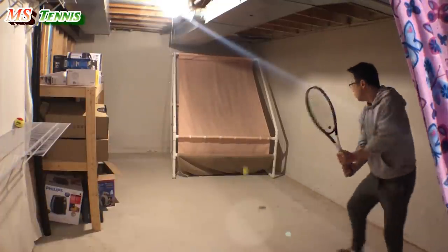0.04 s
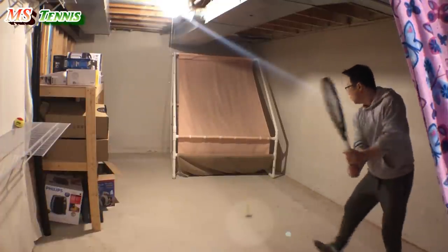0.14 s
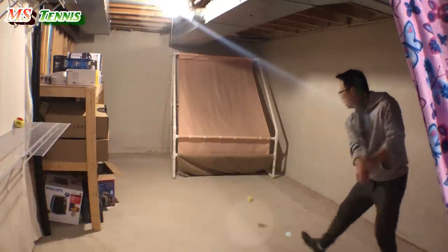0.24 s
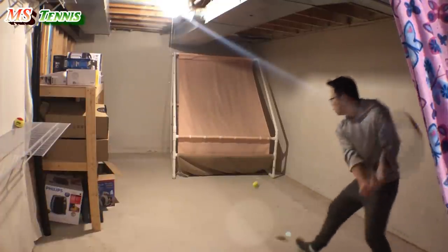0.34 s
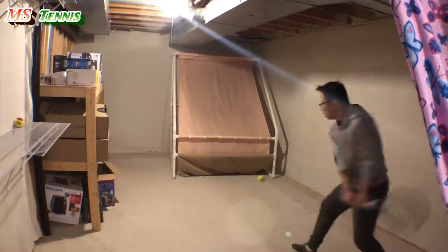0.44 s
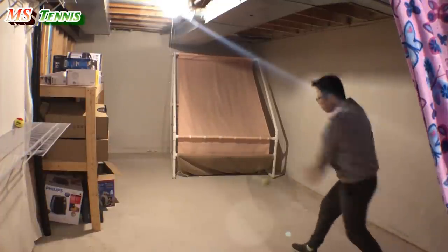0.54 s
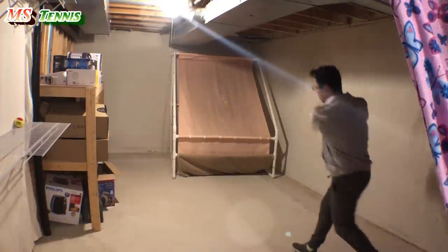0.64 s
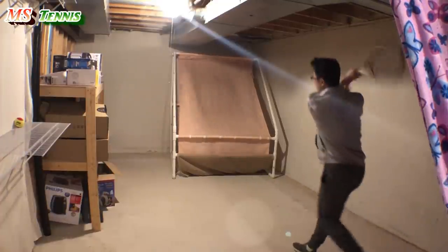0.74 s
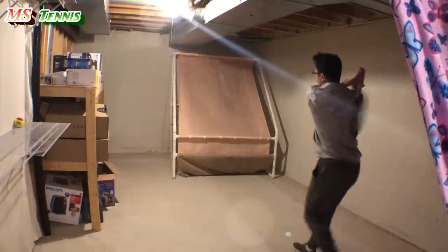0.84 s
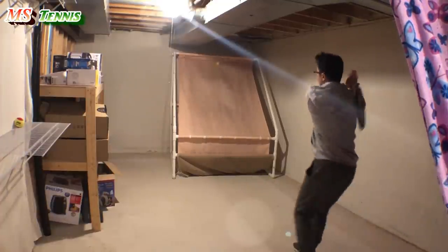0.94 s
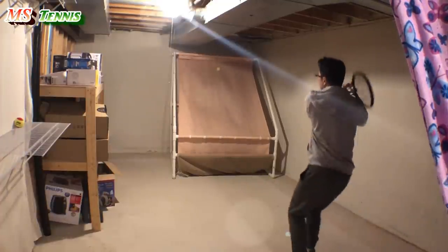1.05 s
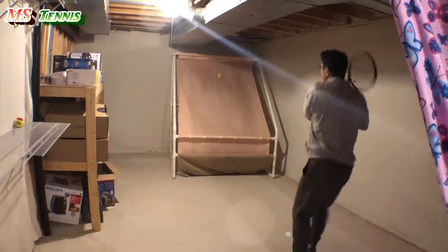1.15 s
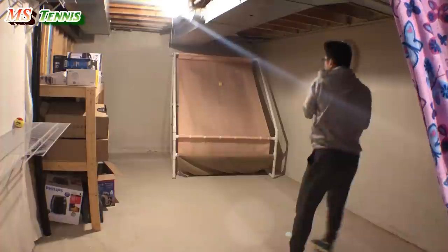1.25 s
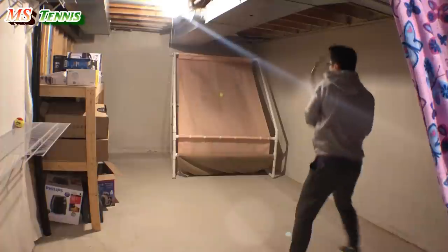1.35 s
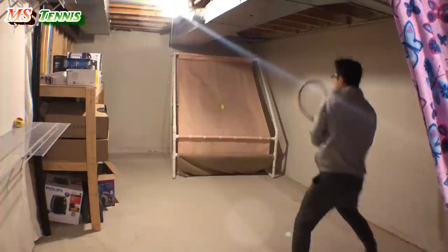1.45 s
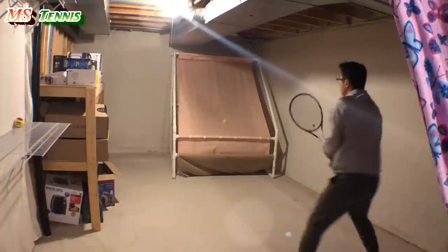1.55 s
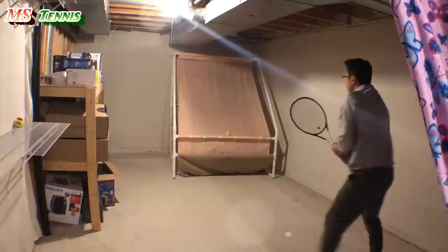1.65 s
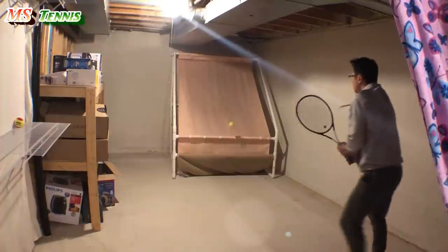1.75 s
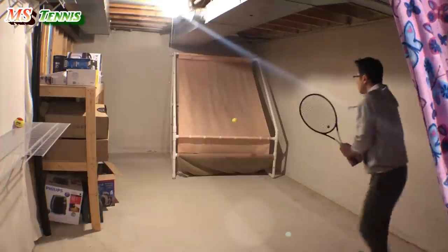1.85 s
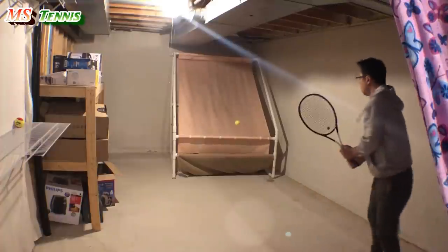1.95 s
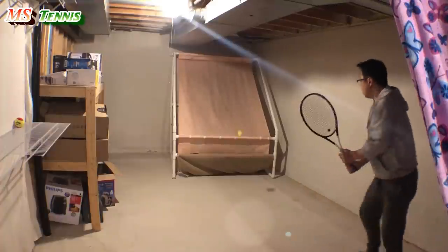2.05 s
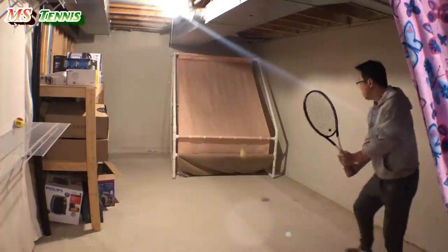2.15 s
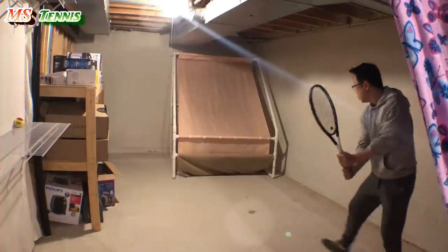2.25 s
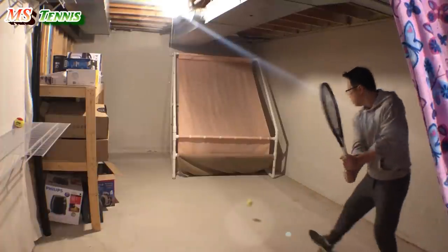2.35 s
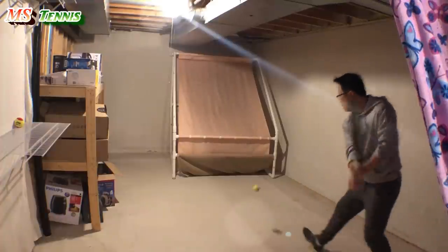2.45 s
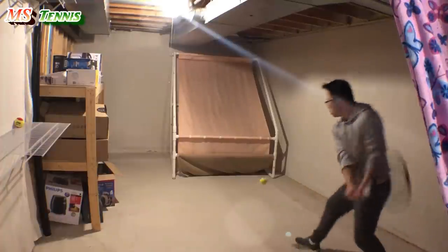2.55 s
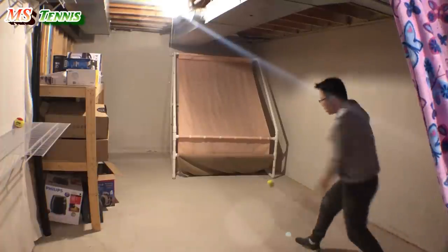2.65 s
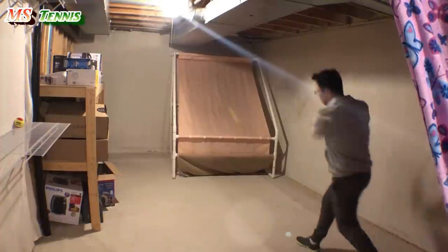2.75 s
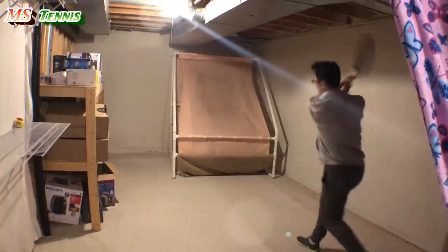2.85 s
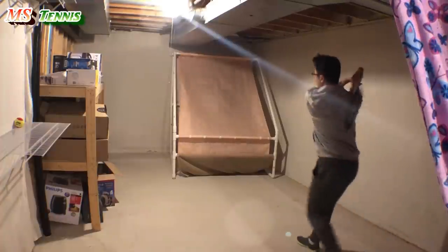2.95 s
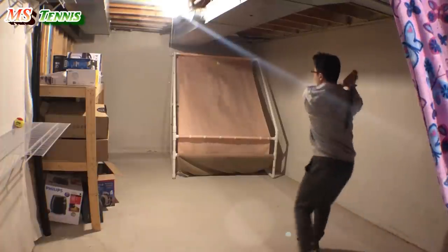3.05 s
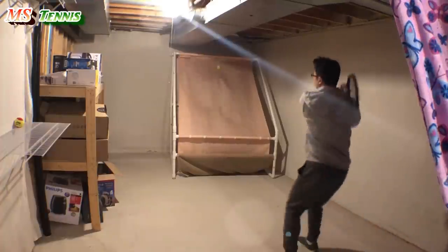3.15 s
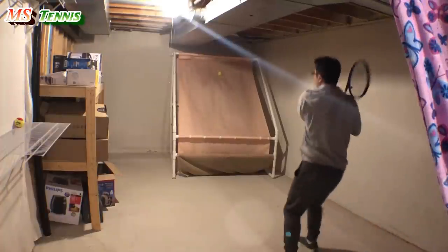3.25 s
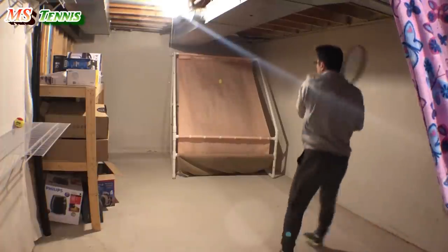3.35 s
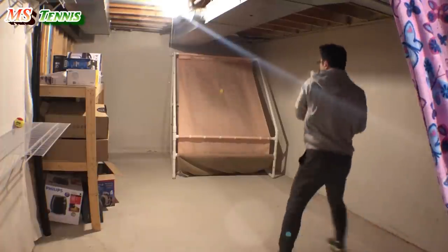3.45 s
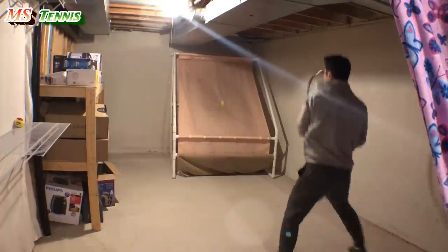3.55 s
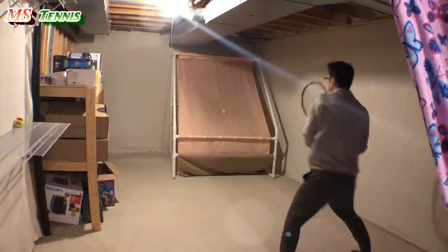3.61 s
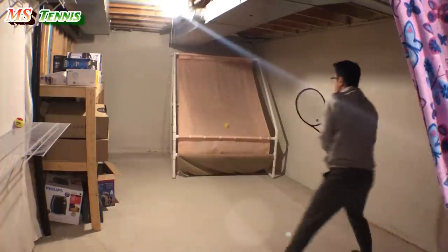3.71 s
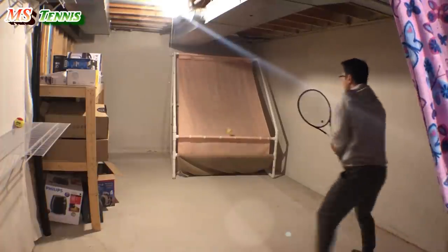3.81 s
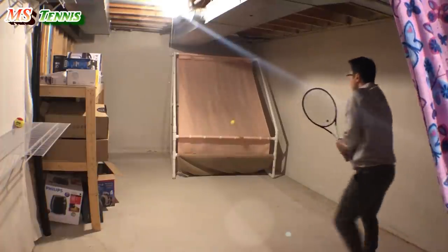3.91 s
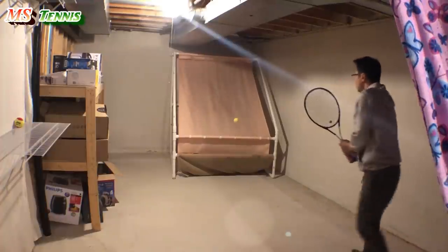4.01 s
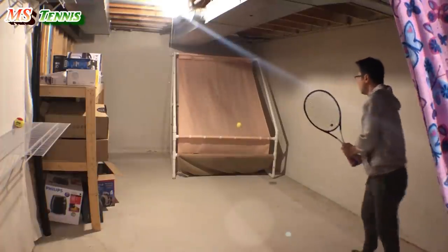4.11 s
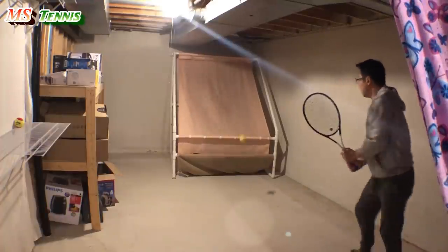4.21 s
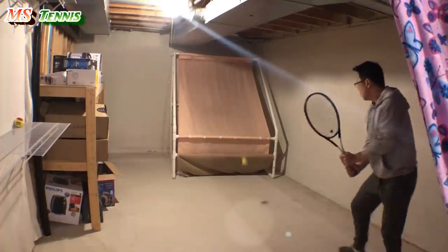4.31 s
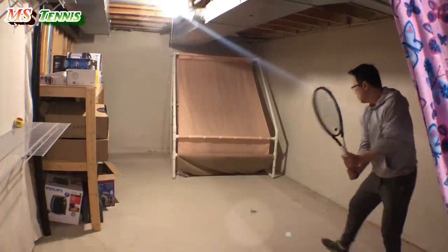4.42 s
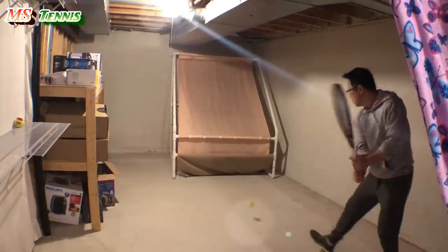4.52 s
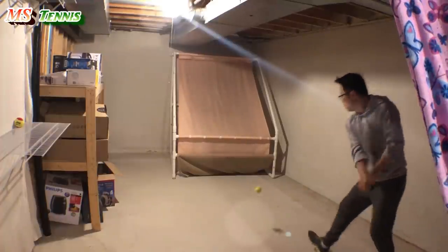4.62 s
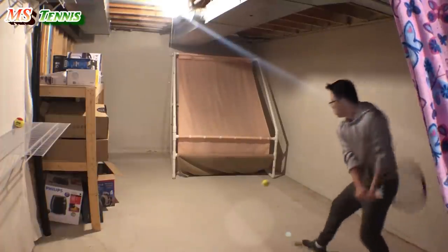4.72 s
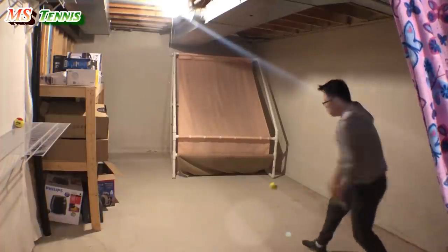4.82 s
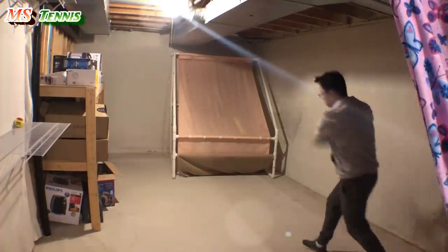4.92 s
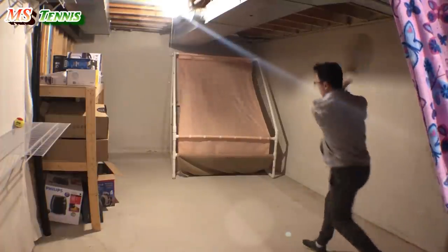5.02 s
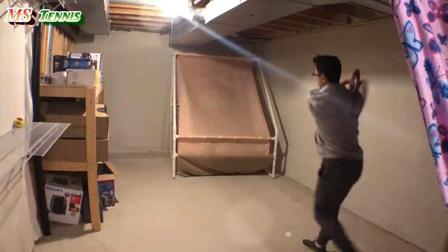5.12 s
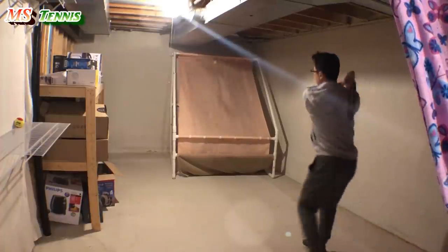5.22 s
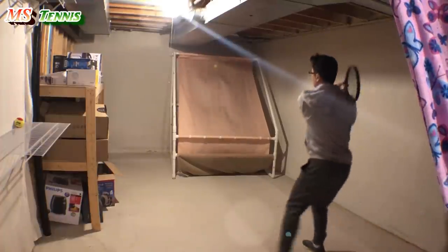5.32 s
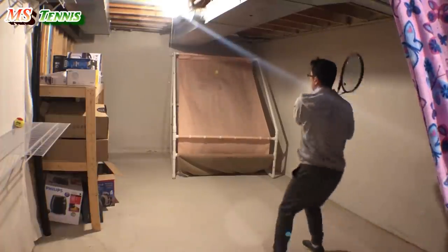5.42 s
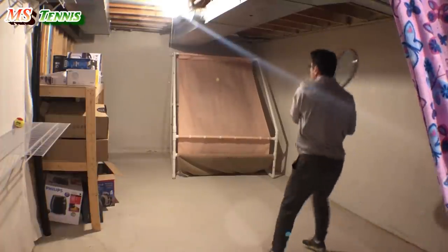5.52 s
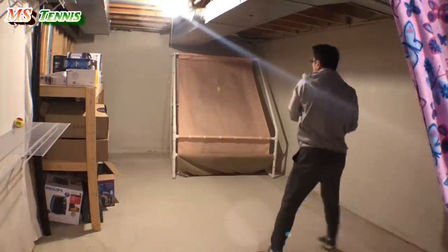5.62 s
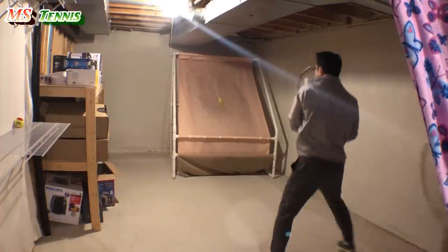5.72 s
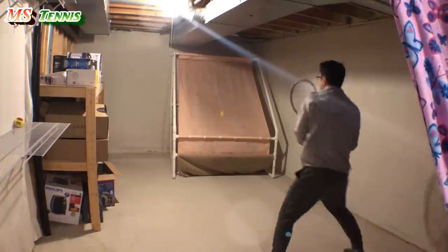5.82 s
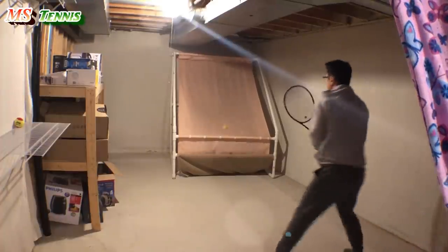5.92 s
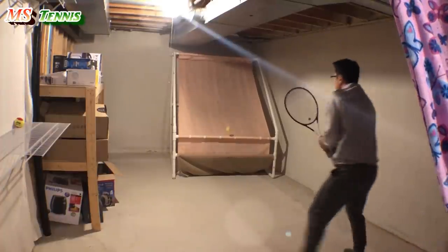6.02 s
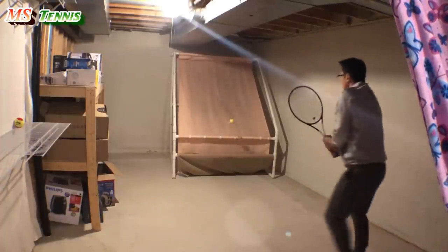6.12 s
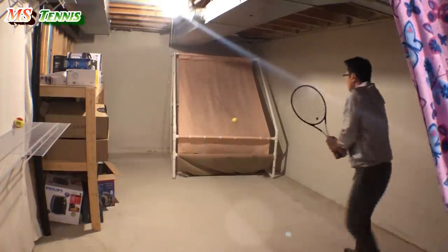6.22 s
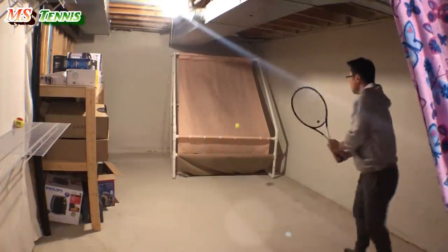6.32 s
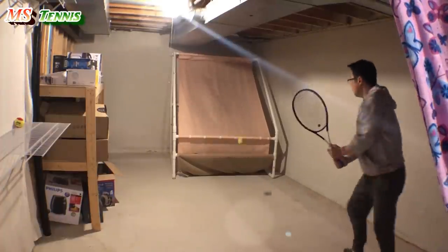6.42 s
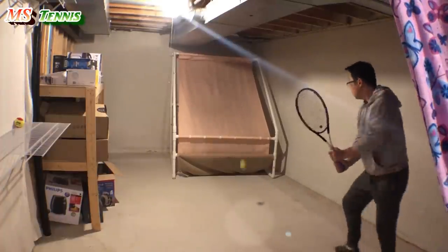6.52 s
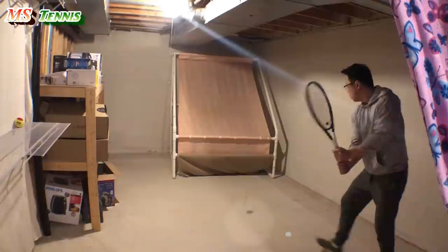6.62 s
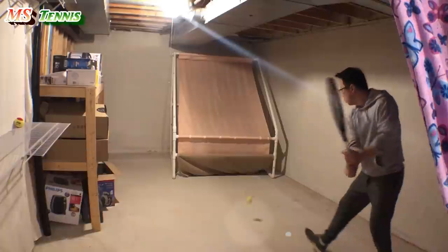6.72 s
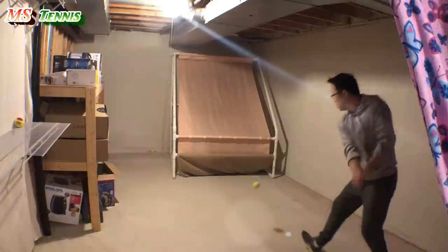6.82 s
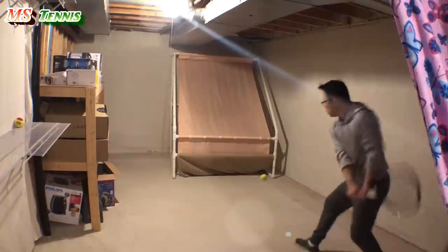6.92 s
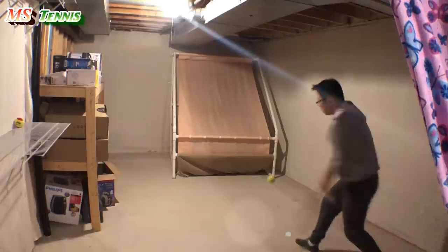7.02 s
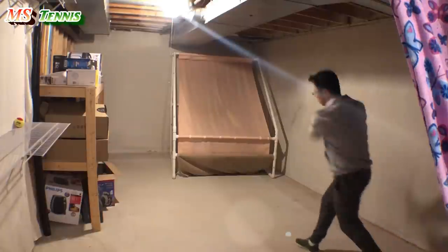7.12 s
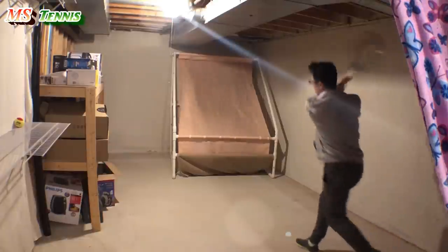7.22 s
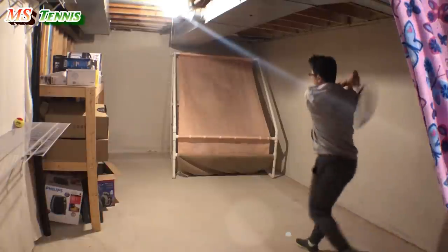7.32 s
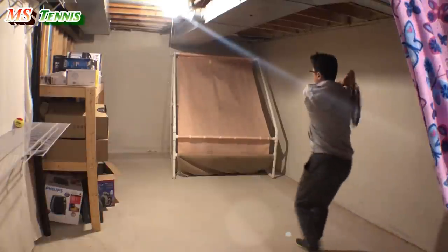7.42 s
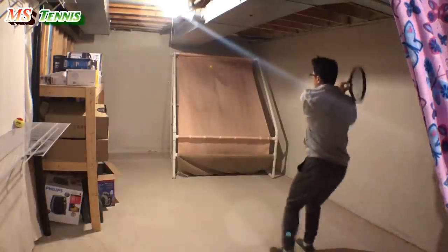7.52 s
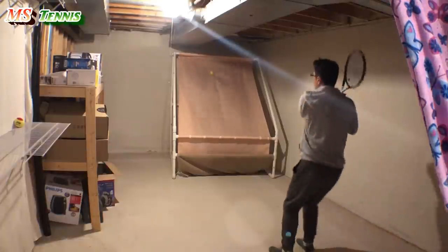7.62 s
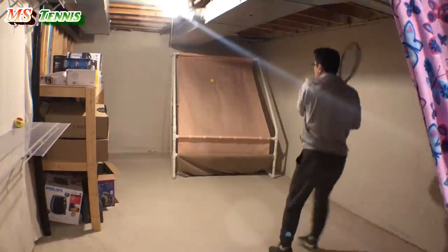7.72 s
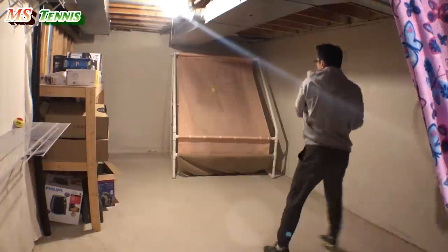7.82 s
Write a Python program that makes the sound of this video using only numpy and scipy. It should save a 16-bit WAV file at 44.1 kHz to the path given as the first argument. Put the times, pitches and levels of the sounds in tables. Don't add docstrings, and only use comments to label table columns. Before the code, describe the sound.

In a small, hard-walled basement, a tennis ball knocks softly on concrete, then pops sharply off racket strings. A moment later it thuds into hanging cloth, whose frame cracks loudly. A shoe scuffs, the bar clacks, the ball drops softly back into the cloth, and the cycle repeats about every two seconds, four strokes in all. A small, midrange-heavy microphone hears it with short bright room echo.

```python
import sys
import numpy as np
from scipy import signal
from scipy.fft import rfft, irfft
from scipy.io import wavfile
from scipy.ndimage import uniform_filter1d

SR = 44100
rng = np.random.default_rng(int(sys.argv[2]) if len(sys.argv) > 2 else 0)


def natural_amplitude(level_db):
    exponent = np.asarray(level_db, float) / 20
    return 10 ** exponent


def to_wav(s):
    ch = np.atleast_2d(s).T
    pcm = np.round(np.clip(ch, -1, 1) * 32767)
    wavfile.write(sys.argv[1], SR, pcm.astype(np.int16))


N = 346537
TAIL = 24576
FAINT_DB = -17

# start_s, peak_db, contact_s, treble_shelf_db, bass_shelf_db
STROKES = [
    (0.62, -9.5, 0.0057, -1, -2.5),
    (2.78, -9.5, 0.0016, -1.8, -2.5),
    (4.962, -10, 0.0021, -1.6, -0.8),
    (7.155, -12, 0.0012, 0.086, -0.5),
]
# start_s, peak_db, contact_s, treble_shelf_db, bass_shelf_db
CATCHES = [
    (0.746, -21, 0.037, 0.8, -3.5),
    (1.724, -34.5, 0.016, -1.5, -2.5),
    (2.907, -17, 0.034, -1, -0.5),
    (3.891, -35, 0.025, -1.5, -4),
    (5.088, -20, 0.087, 0, -4.5),
    (6.075, -35, 0.03, -3.4, -3.5),
    (7.282, -16.5, 0.021, -3, 0.5),
]
# frequency_hz, level_db
MIC = [(20, -22), (55, 2), (1500, 2), (2150, 4.5), (2530, 7), (3100, -4), (4500, -10), (6100, -16),
       (6900, -12), (8300, -27), (9700, -15), (12300, -25.5), (15300, -13.5), (15850, -26), (16100, -49.5)]


def racket_strokes():
    # frequency_hz, level_db
    strings = [(60, -19), (150, -12), (240, -4), (420, -0.5), (540, -8.5), (780, -4.5), (980, 0),
               (1150, -4), (1450, -15.5), (2400, -12), (3300, -13), (4800, -10), (9000, -14.5),
               (16000, -25)]
    # frequency_hz, width_hz, level_db
    racket_modes = [(242, 23, 0), (399, 55, -4.5), (1700, 114, 1.5), (1070, 190, -8.5), (2394, 72, 0),
                    (3210, 160, 2), (4880, 380, -1)]
    hits = blows(STROKES, strings, direct_db=FAINT_DB, early_db=-14.0, grit_db=FAINT_DB,
                 grain_db=-13.0, rise=0.35, trim_db=-8.5)
    return natural_amplitude(-1.5) * ringing(hits, racket_modes)


def ball_bounces():
    # start_s, peak_db, contact_s, treble_shelf_db, bass_shelf_db
    bounces = [
        (0.239, -26, 0.00019, -10, 0.5),
        (2.399, -27.5, 0.00047, -16, 1.5),
        (4.569, -27, 0.00042, -7, 5),
        (6.755, -27.5, 0.00043, -7, 2),
    ]
    # frequency_hz, level_db
    ball = [(120, -22.5), (200, -5.5), (265, -2), (340, -13.5), (620, -22.5), (900, -12), (1060, -1.5),
            (1250, -6.5), (1700, -11.5), (2500, -10.5), (3300, -16), (5000, -22), (8000, -33), (16000, -33)]
    return blows(bounces, ball, direct_db=-3, early_db=-10.5, grit_db=FAINT_DB,
                 grain_db=1.5, rise=0.13, trim_db=-5.5)


def cloth_catches():
    # frequency_hz, level_db
    sheet = [(100, 6), (300, 3.5), (550, -4), (1000, -9.5), (1500, -10.5), (2500, -9), (5000, -12.5),
             (16000, -15)]
    return blows(CATCHES, sheet, direct_db=-4.0, early_db=-12.5, grit_db=17.5,
                 grain_db=2.5, rise=0.042, trim_db=-6.0)


def frame_snaps():
    # start_s, peak_db, contact_s, treble_shelf_db, bass_shelf_db
    snaps = [(0.792, -17.5, 0.011, 0, -1), (0.817, -4, 0.011, -3, -2.5), (0.829, -8.5, 0.011, -3, -1.5),
             (0.845, -12.5, .012, -3, -1), (2.949, -19, 0.0091, 1, -7), (2.9765, -6.5, 0.01, -2.5, -9),
             (2.993, -7.5, 0.011, -5.5, -2.5), (3.016, -14, 0.013, -4.5, -3), (5.131, -19, .008, -1, -6),
             (5.156, -15.5, 0.0083, -1, -8), (5.164, -3.5, 0.011, -1.2, -2), (5.184, -11, 0.017, -6, -2.5),
             (5.209, -17.5, 0.014, -1, -2), (7.315, -18, 0.02, 0, 1), (7.346, -5, 0.006, -0.5, 1),
             (7.36, -8.5, 0.013, -5, -1)]
    # frequency_hz, level_db
    frame = [(100, -10), (240, -4.5), (350, -0.5), (520, 3.5), (700, -5.5), (1000, -3), (1500, -12),
             (2000, -10), (2600, -4), (3400, -9), (5000, -10), (16000, -17.5)]
    early_creak = [0.004, 0, 0, 0, 0]
    return blows(np.subtract(snaps, early_creak), frame, direct_db=3.5, early_db=-14, grit_db=16.0,
                 grain_db=3.5, rise=0.35, trim_db=-9)


def bar_taps():
    # start_s, peak_db, contact_s, treble_shelf_db, bass_shelf_db
    taps = [(0.7468, -16, 0.001, -7, -9), (1.7265, -40, 0.0006, -3, -8), (1.9492, -38.5, 0.0006, -1, -9),
            (2.612, -46.5, .0006, -3, -3), (2.9063, -15, 0.00034, -11, 2), (3.6306, -39, .0006, -2, -3),
            (3.6759, -32, 0.00048, 1, -10), (3.7771, -36.5, 0.00028, 6, 7.5),
            (3.8924, -40, 0.00066, -8, -9), (4.118, -37.5, 0.002, -9, -4), (5.0893, -25, 0.00047, -7, -3),
            (5.8839, -27.5, 0.001, -7.5, -9), (6.0784, -34, 0.00066, -4, -2), (6.357, -39, .001, -8, -2),
            (6.9092, -49.5, .002, 3, -8), (7.0172, -44.5, 0.0007, 1, 15), (7.2843, -11.5, 0.0006, -6, 1)]
    # start_s, peak_db, contact_s, treble_shelf_db, bass_shelf_db
    clacks = [
        (1.4098, -22.5, 0.0015, -3.5, -6),
        (3.5794, -21, 0.00065, -7.5, 4),
        (5.773, -31.5, 0.00072, 0.5, -2),
    ]
    # frequency_hz, level_db
    bar = [(100, -23.5), (300, 6.5), (600, 4.5), (1000, -1.5), (1800, -7), (3000, -4.5), (6000, -2),
           (16000, -10)]
    # frequency_hz, level_db
    rail = [(100, -23), (300, 6), (480, 4.5), (800, -1.5), (1150, -1), (1800, -5), (3000, -3), (6000, -1.5),
            (16000, -10)]
    tapping = blows(taps, bar, direct_db=-9.5, early_db=-12.5, grit_db=FAINT_DB,
                    grain_db=3.0, rise=0.3, trim_db=-10)
    clacking = blows(clacks, rail, direct_db=-4, early_db=-11.0, grit_db=-40,
                     grain_db=-1.0, rise=0.17, trim_db=-8.0)
    return tapping + clacking


def pumps(mode_hz=60, mode_t60=0.28):
    # start_s, peak_db, pitch_hz, room_ring_db, length_cycles
    strokes_of_air = [(0.769, -17.5, 90, -14, 0.8), (0.8296, -16, 84.5, -7, 0.61),
                      (1.7574, -36, 66.6, -2, 0.58), (2.9258, -17, 91, -15, 0.57),
                      (2.993, -17.5, 86, -17, 0.75), (3.9265, -35.5, 65.6, -7, 0.79),
                      (5.1134, -17, 89, -11, 0.63), (5.1788, -21.5, 80, -22, 1), (6.11, -35, 72, -8, 0.8),
                      (6.127, -37, 70, -6, .8), (6.49, -48, 85, -8, 0.69), (6.525, -50, 90, -8, .8),
                      (1.3, -46, 100, -10, 2.5), (7.83, -45, 105, -12, 1.4), (7.3012, -16, 90, -16, 0.55),
                      (7.365, -18.5, 86, -28, 1.1)]
    out, t = np.zeros(N), np.arange(-2048, 16384) / SR
    for s, peak_db, hz, ring_db, turns in strokes_of_air:
        push = np.cos(2 * np.pi * hz * t - .35) * np.exp(-(t * hz / turns) ** 2)
        swell = np.clip(t / 0.025, 0, 1)
        ring = swell * natural_amplitude(ring_db - 60 * t / mode_t60) * np.cos(2 * np.pi * mode_hz * t)
        add(out, s + t[0], natural_amplitude(peak_db) * (push + ring))
    return out


def swings(level_db=-48, build=.008, lead=0.042, from_hz=11000, to_hz=15000, whistle_db=-4):
    # frequency_hz, level_db
    swish = [(2000, -27), (6000, -25), (10000, 0), (13000, 6), (16000, -8)]
    out, t = np.zeros(N), np.arange(-8192, 0) / SR
    speed = 1 / (1 + np.exp(-(t + lead) / build))
    turn = np.cos(2 * np.pi * np.cumsum(from_hz + (to_hz - from_hz) * speed) / SR)
    for row in STROKES:
        hiss, flutter = rng.standard_normal((2, len(t)))
        whistle = evened(uniform_filter1d(flutter, size=16) * turn) * np.sqrt(speed)
        add(out, row[0] + t[0], evened(coloured(hiss, swish)) * speed + natural_amplitude(whistle_db) * whistle)
    return natural_amplitude(level_db) * out


def shoe_scuffs():
    # start_s, peak_db, contact_s, treble_shelf_db, bass_shelf_db
    scuffs = [(1.03, -30, 0.053, 1, -2), (1.243, -44, 0.064, -5, -2), (1.5, -36.5, 0.032, -8, 1),
              (1.586, -42.5, 0.02, -20, 14), (1.95, -38.5, 0.048, 3, -1), (2.138, -48.5, 0.024, -3, -2),
              (3.207, -28.5, 0.037, -0.5, 0.5), (3.41, -49.5, 0.071, -4, -3), (4.135, -38, 0.062, -1, -5),
              (4.237, -54, 0.099, -2, -2), (5.43, -28, 0.033, -4, -2.2), (6.365, -36, 0.043, -3, -2),
              (6.567, -49, 0.033, -2.2, -2), (7.598, -29, 0.045, 0, -1)]
    # frequency_hz, level_db
    sole = [(100, -15), (400, -2.5), (900, -5.5), (1600, -4.5), (2600, 2), (4500, 6), (7000, 6),
            (16000, -2)]
    return blows(scuffs, sole, direct_db=1.5, early_db=-10.5, grit_db=26, grain_db=3.0, rise=0.15, trim_db=-10)


def squeaks():
    # start_s, length_s, pitch_hz, width_hz, level_db
    slips = [
        (0.05, 0.056, 1300, 300, -66),
        (0.055, .06, 2200, 250, -66),
        (2.138, 0.034, 1280, 300, -61),
        (2.635, 0.029, 800, 200, -62),
        (4.867, 0.048, 2540, 80, -66),
        (4.839, 0.057, 1300, 200, -63),
        (6.563, 0.037, 1340, 200, -59),
    ]
    out, t = np.zeros(N), np.arange(4096) / SR
    for s, length, hz, width_hz, db in slips:
        pole = np.exp((2j * hz - width_hz) * np.pi / SR)
        slip = signal.lfilter([1], [1, -pole], rng.standard_normal(len(t))).real
        add(out, s, natural_amplitude(db) * evened(slip) * np.sin(np.pi * np.clip(t / length, 0, 1)))
    return signal.oaconvolve(out, room(echoes(), direct_db=3.5, early_db=-25))[:N]


def stir():
    # frequency_hz, level_db
    sway_colour = [(25, -39), (45, -8.5), (62, -4), (80, -6), (102, 2.5), (135, -5.5), (190, -18.5),
                   (400, -35)]
    # frequency_hz, level_db
    murmur_colour = [(100, -32), (200, 3), (260, -1.5), (400, -3), (700, -10.5), (1200, -12.5), (2000, -26)]
    # frequency_hz, level_db
    rustle_colour = [(700, -27.5), (1300, -4), (2000, -5), (3000, 0.5), (4000, -8.5), (6000, -33)]
    # frequency_hz, level_db
    hiss_colour = [(2500, -33.5), (4200, 0), (8000, -2.5), (16000, -7)]
    # frequency_hz, level_db
    rumble_colour = [(25, -32), (40, -6), (50, -1), (62, -9), (100, -30)]
    # centre_s, half_length_s, rustle_db, hiss_above_rustle_db
    moves = [(0.03, 0.13, -61, -10), (0.45, 0.065, -63.5, -4), (0.61, 0.063, -53.5, -11.5),
             (1.283, 0.093, -55.5, -17), (1.646, 0.097, -57.5, -11.5), (1.788, 0.084, -56, -20),
             (2.19, 0.14, -72.5, -8), (2.6, 0.046, -64, -16), (2.764, .05, -56.5, -9),
             (3.442, 0.057, -62, -12), (3.84, 0.063, -53, -12), (3.94, 0.073, -54.5, -25),
             (4.2, 0.15, -64.5, -13), (4.72, 0.11, -64, -12.5), (4.946, 0.057, -52.5, -13.5),
             (5.516, 0.1, -56, -16), (6.013, 0.081, -56, -10.5), (6.153, 0.076, -58.5, -25),
             (6.466, 0.13, -66, -8), (7.142, .05, -54.5, -11), (7.64, 0.073, -48.5, -22)]
    # sway_db, murmur_db, rustle_db, hiss_db
    still_db = [-72.5, -63, -65.5, -79]
    hard_db = -25
    hard = [row[0] for row in CATCHES if row[1] > hard_db]
    soft = [row[0] for row in CATCHES if row[1] <= hard_db]

    centre, half, move_db, bright_db = np.transpose(moves)
    bumps = np.exp(-2 * ((np.arange(0, N, 64)[:, None] / SR - centre) / half) ** 2)
    moving = bumps @ natural_amplitude(move_db) ** 2
    follow = swells([row[0] for row in STROKES], top_db=-47, rise=0.1, hold=0.1237, fall_db=82)

    sway, murmur, rustle, hiss = natural_amplitude(still_db) ** 2
    sway = sway + swells(hard, top_db=-50, rise=0.13, hold=0.41, fall_db=19.5)
    sway = sway + swells(soft, top_db=-55.5, rise=0.15, hold=0.03, fall_db=72)
    sway = sway + natural_amplitude(-6) ** 2 * moving
    murmur = murmur + swells(hard, top_db=-43.5, rise=0.0142, hold=0.1238, fall_db=110)
    murmur = murmur + swells(soft, top_db=-62.5, rise=1, hold=0.05, fall_db=61)
    murmur = murmur + natural_amplitude(-5.5) ** 2 * (moving + follow)
    rustle = rustle + swells(hard, top_db=-44.5, rise=0, hold=0.168, fall_db=59) + follow + moving
    hiss = hiss + swells(hard, top_db=-52, rise=0.0626, hold=0.028, fall_db=56)
    hiss = hiss + bumps @ natural_amplitude(move_db + bright_db) ** 2
    rumble = natural_amplitude(-70.5) ** 2 + 0 * sway
    return (drift(sway_colour, sway, size=2048, patchy_db=1.6)
            + drift(murmur_colour, murmur, size=1024, patchy_db=0.5)
            + drift(rustle_colour, rustle, size=512, patchy_db=1.7)
            + drift(hiss_colour, hiss, size=512, patchy_db=1.0)
            + drift(rumble_colour, rumble, size=2048, patchy_db=0.6))


def blows(rows, body, direct_db, early_db, grit_db, grain_db, rise, trim_db):
    out, t, size = np.zeros(N), np.arange(8192) / SR, TAIL + 12288
    tails = [echoes() for _ in range(4)]
    mic = rfft(causal(MIC), size)
    for k, (s, peak_db, contact, bright_db, heavy_db) in enumerate(rows):
        u = t / max(contact, 1e-4)
        roughness = np.clip(rng.standard_normal(len(t) // 64), -1.5, 1.5).repeat(64)
        envelope = (1 - np.exp(-u / rise)) * np.exp(-u ** 2)
        grit = rng.standard_normal(len(t)) * natural_amplitude(grain_db * roughness) * envelope
        push = (t == 0) + natural_amplitude(grit_db) * grit / np.linalg.norm(grit)
        space = room(tails[k % len(tails)], direct_db, early_db)
        sound = rfft(push, size) * rfft(space, size) * rfft(causal(body, bright_db, heavy_db), size)
        loudest = np.sqrt(uniform_filter1d(irfft(sound * mic)[:len(t)] ** 2, 400).max())
        add(out, s, natural_amplitude(peak_db + trim_db) * irfft(sound)[:TAIL] / loudest)
    return out


def ringing(x, modes):
    out = x
    for hz, width_hz, db in modes:
        pole = np.exp((2j * hz - width_hz) * np.pi / SR)
        out = out + 2 * natural_amplitude(db) * signal.lfilter([1 - abs(pole)], [1, -pole], x).real
    return out


def room(tail, direct_db, early_db):
    out = tail.copy()
    near = (np.geomspace(50, 600, 10) * rng.uniform(.9, 1.1, 10)).astype(int)
    out[near] += natural_amplitude(early_db) * rng.choice([-1., 1.], 10) * (near / 100) ** -.3
    out[0] = natural_amplitude(direct_db)
    return out


def echoes():
    # frequency_hz, t60_s
    walls = [(60, 0.95), (150, 0.43), (330, 0.35), (900, 0.38), (2400, 0.41), (6000, 0.31), (15000, 0.21)]
    taps = np.zeros(TAIL)
    at = np.arange(40, TAIL - 12, 12)
    taps[at + rng.integers(0, 12, len(at))] = rng.choice([-1., 1.], len(at))
    hz, t, z = signal.stft(taps, SR, nperseg=512)
    decay = natural_amplitude(-60 * t / read(walls, hz)[:, None])
    tail = signal.istft(z * decay, SR, nperseg=512)[1][:TAIL]
    tail *= 1 - np.exp(-np.arange(TAIL) / SR / 0.0042)
    return tail / np.linalg.norm(tail)


def drift(body, power, size, patchy_db):
    frames, hz = 4 * N // size + 5, np.fft.rfftfreq(size, 1 / SR)
    hz = hz[hz < 1.2 * body[-1][0]]
    a, b, patches = rng.standard_normal((3, frames, len(hz))).transpose(0, 2, 1)
    patches = evened(uniform_filter1d(uniform_filter1d(patches, 6, 0), 8, 1))
    z = np.zeros((size // 2 + 1, frames), complex)
    z[:len(hz)] = (a + 1j * b) * natural_amplitude(read(body, hz)[:, None] + patchy_db * patches)
    noise = signal.istft(z, nperseg=size, noverlap=3 * size // 4)[1][:N]
    level = np.interp(np.arange(N), np.arange(0, N, 64), np.sqrt(power))
    return noise / np.std(coloured(noise[:2 * SR], MIC)) * level


def swells(times, top_db, rise, hold, fall_db):
    t = np.arange(0, N, 64)[:, None] / SR - np.asarray(times)
    shape = np.clip(t / rise, 0, 1) * natural_amplitude(top_db - fall_db * np.maximum(t - rise - hold, 0))
    return (shape ** 2).sum(1)


def causal(points, bright_db=0., heavy_db=0.):
    hz = abs(np.fft.fftfreq(4096, 1 / SR))
    treble_db = bright_db * read([(1500, 0), (8000, 1)], hz)
    bass_db = heavy_db * read([(500, 1), (1500, 0)], hz)
    log_gain = np.log(natural_amplitude(read(points, hz) + treble_db + bass_db))
    return np.fft.ifft(np.exp(np.conj(signal.hilbert(log_gain)))).real[:2048]


def coloured(x, points):
    return signal.oaconvolve(x, causal(points))[:len(x)]


def read(points, hz):
    f, value = np.transpose(points)
    return np.interp(np.log(hz + 1), np.log(f + 1), value)


def evened(x):
    return x / np.sqrt(np.mean(x ** 2) + 1e-20)


def add(mix, s, sound):
    part = mix[round(s * SR):][:len(sound)]
    part += sound[:len(part)]


def treble_dips(x, depth_db=-22):
    # centre_s, length_s, above_hz, share_surviving
    dropouts = [(0.105, .02, 3800, .3), (0.205, .03, 3600, .35), (0.297, .016, 3800, .2),
                (0.53, .02, 4000, .3), (1.45, .016, 3800, .5), (0.66, .012, 5600, .2),
                (0.79, .016, 3000, .45), (1.0, .016, 3600, .5), (3.24, .03, 3000, .65),
                (3.41, .022, 4000, .55), (3.478, .018, 4500, .55), (3.573, .007, 4200, .1),
                (4.005, .022, 4500, .3), (4.5, .022, 4000, .3), (5.055, .014, 5000, .3),
                (5.178, .014, 3100, .2), (5.728, .03, 3600, .3), (5.879, .011, 4000, .2),
                (6.332, .045, 3100, .3), (6.592, .012, 4000, .35), (6.653, .014, 3600, .4),
                (7.636, .016, 3500, .5), (7.84, .045, 3800, .4)]
    hz, t, z = signal.stft(x, SR, nperseg=512, noverlap=448)
    luck = rng.random((len(dropouts), 129)).repeat(2, axis=1)[:, :len(hz)]
    luck = luck + (hz > 7500) * .3
    for (s, length, edge_hz, share), draw in zip(dropouts, luck):
        lost = (hz > edge_hz) & (draw > share)
        z[:, abs(t - s) < length / 2] *= natural_amplitude(depth_db * lost)[:, None]
    return signal.istft(z, SR, nperseg=512, noverlap=448)[1][:N]


def scene():
    impacts = racket_strokes() + ball_bounces() + cloth_catches() + frame_snaps() + bar_taps()
    return (impacts + pumps() + swings() + shoe_scuffs() + squeaks() + stir())[None]


def top_cut(x):
    return signal.sosfilt(signal.butter(12, 16760, fs=SR, output="sos"), x)


def record(dry):
    # frequency_hz, level_db
    preamp = [(3000, -6), (6000, -24.5), (9000, 5), (12000, -6), (15700, 1), (16000, -42)]
    hiss = natural_amplitude(-85.5) * evened(coloured(rng.standard_normal(N), preamp))
    mix = treble_dips(coloured(dry[0], MIC) + hiss)[None]
    return top_cut(mix)


dry = scene()
out = record(dry)
to_wav(out)
```